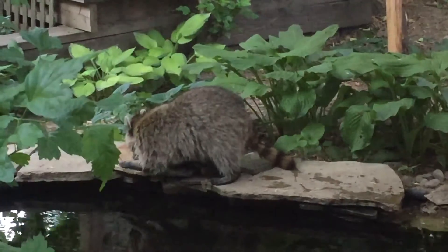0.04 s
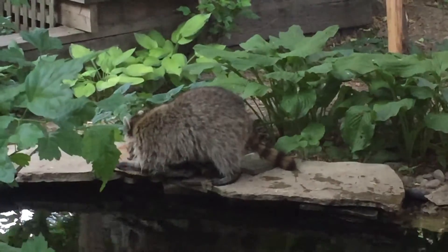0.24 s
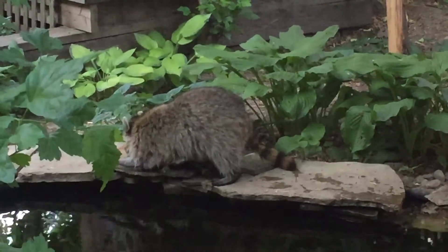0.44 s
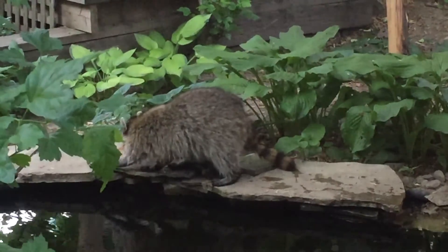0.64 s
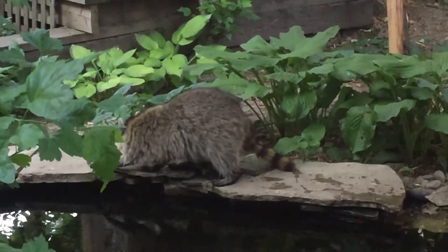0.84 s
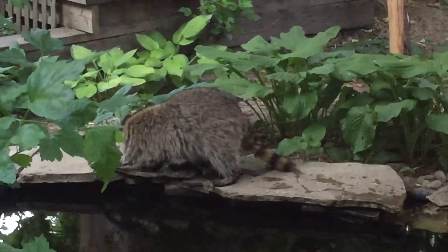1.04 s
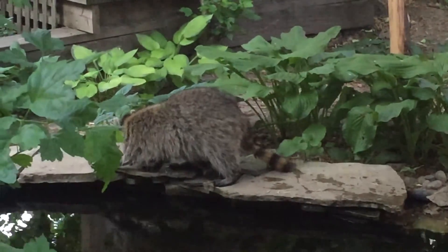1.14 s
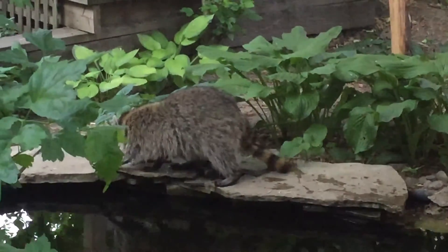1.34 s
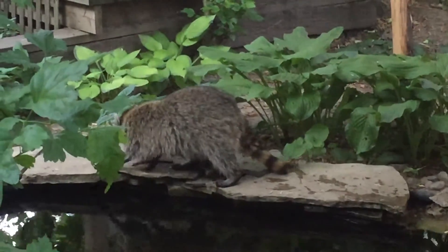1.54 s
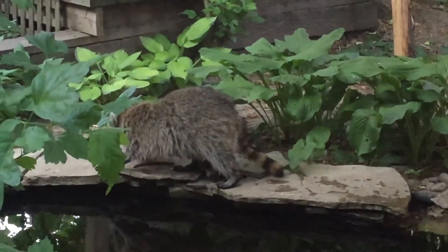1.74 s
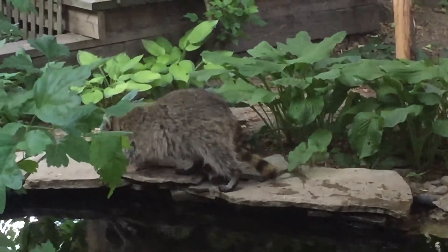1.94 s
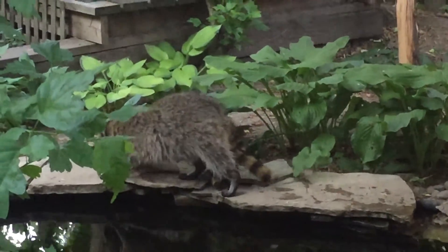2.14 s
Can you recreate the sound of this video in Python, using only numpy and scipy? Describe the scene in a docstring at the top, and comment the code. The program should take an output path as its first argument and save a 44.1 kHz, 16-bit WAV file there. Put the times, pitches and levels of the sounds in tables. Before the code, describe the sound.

A small bird gives one loud, rough chirp near the start, echoing briefly in a garden. Soft pond drips continue while a raccoon shuffles and ticks over leaves and stone, with faint far birds and a low town rumble.

```python
"""Chirp at a garden pond.

A small bird gives one loud, rough chirp; its two voices beat and ring between house walls.
Drips ring bubbles in the pond. A raccoon shuffles and ticks over stone and leaves.
Other birds whistle far off, over the low rumble of a town."""
import sys
import numpy as np
from scipy import signal
from scipy.fft import rfft, irfft, next_fast_len
from scipy.io import wavfile
from scipy.ndimage import uniform_filter1d, map_coordinates

SR = 44100
rng = np.random.default_rng(int(sys.argv[2]) if len(sys.argv) > 2 else 0)


def transcribe(signal):
    """Save signal, clipped to [-1, 1], as a 16-bit WAV file at the path in sys.argv[1]."""
    frames = np.atleast_2d(signal).T
    limited = np.clip(frames, -1, 1)
    pcm = np.round(limited * 32767).astype(np.int16)
    wavfile.write(sys.argv[1], SR, pcm)


N = 97020

# Spectra of town, air, leaves and splashes. Each row: frequency in Hz, relative level in dB.
RUMBLE_SPECTRUM = [(28, -49), (39, -14), (50, -3), (95, -0.5), (160, -11.5), (225, -10.5), (330, -17.5),
                   (480, -31), (900, -52)]
AIR_SPECTRUM = [(250, -11.5), (450, 1), (900, -1), (1500, -1.5), (2000, -4.5), (2900, -2), (4000, -14),
                (6500, -9), (9000, -12), (13500, -16), (15700, -28)]
LEAF_SPECTRUM = [(800, -2), (2000, -4.5), (4500, 3), (7000, -9), (10000, -11.5), (15500, -29)]
SPLASH_SPECTRUM = [(600, -34), (1250, 6), (1800, -4), (2600, -1.5), (4800, -14), (6500, -12), (14000, -46)]
# Yard decay. Each row: frequency in Hz, T60 in seconds.
YARD_DECAY = [(500, 0.39), (1500, 0.1), (2400, 0.45), (3200, 0.53), (4500, 0.44), (10000, 0.39)]
# House wall echoes. Each row: delay in seconds, gain in dB.
WALL_ECHOES = [(.017, -18), (.046, -22.5)]
# Far birds. Each row: start and length in seconds, start and end pitch in Hz, level in dB.
FAR_WHISTLES = [(0.819, 0.089, 2353, 2260, -61), (1.233, 0.035, 2930, 2300, -58),
                (1.305, 0.068, 2650, 3242, -57), (1.363, .125, 3170, 3130, -70.5),
                (1.39, 0.07, 2506, 2330, -65), (1.782, 0.019, 2970, 2790, -53),
                (1.901, 0.083, 3707, 3400, -62), (1.979, 0.059, 2860, 2810, -51.5)]
# Claws, twigs, leaves, plus the short rasp at 0.193 s that opens the chirp. Each row: start in seconds, level
# in dB, pitch in Hz, width in octaves.
DRY_TICKS = [(.055, -46, 2940, 0.1), (0.057, -45, 4870, .12), (.193, -47, 5300, 0.071),
             (0.628, -45.5, 5740, 0.076), (0.816, -48, 6500, 0.28), (.891, -42.5, 3100, 0.13),
             (1.003, -42, 5620, .09), (1.07, -43, 11800, 0.32), (1.128, -42.5, 3820, 0.25),
             (1.145, -44, 5900, .37), (1.158, -45, 4430, 0.068), (1.303, -47.5, 4100, .11),
             (1.354, -44, 13200, 0.29), (1.488, -51.5, 4300, .13), (1.494, -54, 11500, 0.7),
             (1.573, -49, 1430, 0.23), (1.613, -53, 3860, 0.11), (1.631, -46, 4180, 0.77),
             (1.709, -46.5, 2410, 0.047), (1.899, -37, 3080, 0.22), (1.906, -38, 3400, 0.15),
             (2.027, -44.5, 5260, 0.4)]
# Paws in leaves and in water. Each row: centre and half-length in seconds, level in dB.
LEAF_SHUFFLES = [(0.046, 0.084, -70.5), (.205, 0.054, -55.5), (0.319, 0.047, -60), (0.893, 0.16, -73.5),
                 (1.172, 0.086, -64), (2.048, .12, -75)]
PAW_SPLASHES = [(.175, .018, -61.5), (0.19, 0.011, -51), (1.575, 0.016, -62), (1.716, .012, -59.5),
                (1.78, 0.018, -64)]
# Drips. Each row: start in seconds, level in dB, bubble pitch in Hz, T60 in seconds.
POND_DRIPS = [(.04, -51, 1596, 0.046), (.083, -47.5, 1388, 0.03), (.16, -49.5, 1128, 0.051),
              (.17, -44.5, 1764, 0.044), (.19, -46.5, 1266, 0.059), (.301, -51, 1137, 0.048),
              (.407, -46.5, 778, 0.077), (.484, -50, 1795, 0.046), (.706, -53.5, 1470, .05),
              (.741, -52, 1498, 0.066), (.775, -51, 1686, 0.066), (.826, -54.5, 1410, 0.086),
              (1.087, -50, 1149, 0.036), (1.166, -52, 1405, 0.05), (1.254, -53, 1865, .045),
              (1.282, -46.5, 1152, 0.064), (1.456, -48.5, 1160, 0.053), (1.468, -46.5, 1000, 0.058),
              (1.579, -43, 1187, 0.076), (1.67, -47.5, 1260, 0.037), (1.789, -44, 1310, 0.052),
              (1.839, -53.5, 1210, 0.041), (1.865, -39.5, 1768, 0.031), (2.017, -47, 1098, 0.047),
              (2.115, -45.5, 1725, 0.036), (2.139, -53, 1135, 0.08)]
# The chirp's two voices. Each row: time in seconds, pitch in Hz, level in dB.
LOWER_VOICE = [(.199, 3195, -39), (.208, 3860, -44.5), (.218, 4100, -34.5), (.235, 4100, -33),
               (.242, 3486, -40), (.26, 3600, -37), (.272, 3204, -38.5), (.284, 3252, -36),
               (.298, 3156, -31), (.305, 2704, -38.5), (.316, 2527, -41), (.330, 2483, -51)]
UPPER_VOICE = [(.208, 4245, -38), (.220, 4500, -32.5), (.24, 4426, -33.5), (.26, 4400, -30.5),
               (.276, 4200, -30.5), (.289, 3850, -37), (.301, 3880, -28.5), (.309, 3920, -41)]


def amp(db):
    """Decibels to gain."""
    return 10 ** (np.asarray(db) / 20)


def unit(x):
    """Scale to rms 1."""
    return x / np.sqrt(np.mean(x ** 2) + 1e-20)


def along(points, hz):
    """Interpolate (Hz, value) points on a log axis."""
    point_hz, values = np.transpose(points)
    return np.interp(np.log(hz + 1), np.log(point_hz + 1), values)


def wobble(rate_hz):
    """Smooth random curve, rms near 1."""
    knots = rng.standard_normal(int(N * rate_hz / SR) + 4)
    return map_coordinates(knots, [np.arange(N) * rate_hz / SR])


def filtered(x, response):
    """Apply a frequency response."""
    size = next_fast_len(N + SR // 2)
    return irfft(rfft(x, size) * response(np.fft.rfftfreq(size, 1 / SR)), size)[:N]


def noise(spectrum):
    """Coloured noise, rms 1."""
    return unit(filtered(rng.standard_normal(N), lambda hz: amp(along(spectrum, hz))))


def since(start_s):
    """Seconds since the start, zero before it."""
    return np.maximum(np.arange(N) / SR - start_s, 0)


def gate(start_s, end_s, fade_s):
    """Soft-edged window."""
    edge_s = np.minimum(since(start_s), end_s - start_s - since(start_s))
    return np.sin(np.pi / 2 * np.clip(edge_s / fade_s, 0, 1)) ** 2


def swells(rows):
    """Envelope of one smooth bump per row."""
    return sum(amp(db) * gate(mid_s - half_s, mid_s + half_s, half_s) for mid_s, half_s, db in rows)


def phase_of(hz):
    """Phase of a moving pitch."""
    return 2 * np.pi * np.cumsum(hz) / SR


def scatter(x, echo_db, spread_s=.022):
    """Add early echoes off near stones and leaves."""
    delay, strength = rng.uniform(.05, 1, 14), rng.standard_normal(14)
    taps = np.bincount((delay * spread_s * SR).astype(int), strength * np.exp(-delay))
    return x + amp(echo_db) * signal.fftconvolve(x, taps / np.linalg.norm(taps))[:N]


def walls(x):
    """Add distinct echoes off the house walls."""
    echoes = lambda hz: sum(amp(db) * np.exp(-2j * np.pi * hz * s) for s, db in WALL_ECHOES)
    return x + filtered(x, echoes)


def yard(x, wet_db):
    """Add the diffuse tail among walls and plants."""
    hz, t, bins = signal.stft(rng.standard_normal(SR * 3 // 4), SR, nperseg=256)
    decay = amp(-60 * t / along(YARD_DECAY, hz)[:, None])
    tail = signal.istft(bins * decay * (1 - np.exp(-t / .0016)), SR)[1]
    return x + amp(wet_db) * signal.fftconvolve(x, tail / np.linalg.norm(tail))[:N]


def town(rumble_db=-52, fade_db_per_s=2.5, hum_hz=63.6, hum_db=-61.5):
    """Rumble and faint mains hum. The bass swells unevenly; the upper part recedes."""
    rumble = noise(RUMBLE_SPECTRUM) * amp(rumble_db)
    bass = filtered(rumble, lambda hz: 1 / (1 + (hz / 130) ** 4))
    upper = (rumble - bass) * amp(fade_db_per_s * (1 - since(0)))
    hum = np.sqrt(2) * amp(hum_db) * np.sin(phase_of(hum_hz + wobble(3.96)))
    return upper + bass * amp(2.6 * wobble(13.3)) + hum


def air(level_db=-65.5, patch_db=1.3):
    """Hiss of air. Stirring leaves vary its gain in patches of time and pitch."""
    flutter = amp(.6 * wobble(12))
    bins = signal.stft(noise(AIR_SPECTRUM), nperseg=256)[2]
    patches = uniform_filter1d(rng.standard_normal(bins.shape), size=12, axis=0)
    patches = unit(uniform_filter1d(patches, size=16, axis=1))
    hiss = signal.istft(bins * amp(patch_db * patches), nperseg=256)[1][:N]
    return unit(hiss) * amp(level_db) * flutter


def far_birds():
    """Short wavering whistles, blurred by the yard."""
    out = np.zeros(N)
    for start_s, length_s, start_hz, end_hz, db in FAR_WHISTLES:
        hz = np.interp(since(start_s), [0, length_s], [start_hz, end_hz]) * (1 + .017 * wobble(300))
        envelope = amp(db + 2 * wobble(90)) * gate(start_s, start_s + length_s, .0085)
        out += envelope * np.sin(phase_of(hz))
    return yard(scatter(out, echo_db=-3), wet_db=-14)


def tick(t, hz, width_oct, crack_t60_s=.01, tail_t60_s=.06):
    """Claw, twig, leaf or brief rasp: a damped click and a noisy crack with a short tail."""
    click = np.sin(2 * np.pi * hz * t) * np.exp(-np.pi * width_oct * hz * t) / (1 + (hz / 6000) ** 2)
    band = lambda f: 1 / (1 + (np.log2((f + 1) / hz) / width_oct) ** 2 / 2) ** 2
    crack = unit(filtered(rng.standard_normal(N), band))
    rise_s = .0005 * (1 + (hz / 7500) ** 2) ** 2  # the highest ticks are soft leaf brushes
    attack = 1 - np.exp(-(t / rise_s) ** 2)
    decay = amp(-60 * t / crack_t60_s) + .45 * amp(-60 * t / tail_t60_s)
    return click + .53 * crack * attack * decay


def raccoon(floor_db=-72):
    """Dry ticks and soft, crackling shuffles in the leaves; the ticks also carry the brief rasp that opens the
    chirp."""
    ticks = sum(amp(db) * tick(since(start_s), hz, width) for start_s, db, hz, width in DRY_TICKS)
    leaves = noise(LEAF_SPECTRUM)
    crackle_db = 6.3 * np.tanh(wobble(350) / 2)
    stir_db = 3.5 * wobble(29.65)
    effort = swells(LEAF_SHUFFLES) + amp(floor_db)
    return yard(ticks + effort * unit(leaves * amp(crackle_db + stir_db)), wet_db=-11)


def trickle(count=45, mid_db=-61.5, mid_hz=1762, t60_s=.046):
    """Drip rows for tiny random bubbles."""
    return [(when * N / SR, mid_db + 7 * (level - .5), mid_hz * 2 ** (1.675 * (pitch - .5)), t60_s)
            for when, level, pitch in rng.random((count, 3))]


def pond(bend=.045, settle_s=.002, splash_db=-18):
    """Each drop splashes and rings a bubble that settles on its pitch. Paws stir the water."""
    out = np.zeros(N)
    splash = unit(noise(SPLASH_SPECTRUM) * amp(1.6 * wobble(300)))
    drops = list(POND_DRIPS) + trickle()
    waver = .02 * wobble(250)
    for start_s, db, hz, t60_s in drops:
        first = int(start_s * SR)
        age_s = np.arange(min(SR // 8, N - first)) / SR
        span = slice(first, first + len(age_s))
        bubble = np.sin(phase_of(hz * (1 + bend * np.exp(-age_s / settle_s) + waver[span])))
        attack = 1 - np.exp(-age_s / (.073 * t60_s))
        envelope = 2 * attack * amp(db - 60 * age_s / t60_s)
        out[span] += envelope * (bubble + amp(splash_db) * splash[span])
    out += splash * swells(PAW_SPLASHES)
    return yard(walls(scatter(out, echo_db=-5.5)), wet_db=-10.5)


def rasp(phase, width_hz):
    """Noise band that follows a tone."""
    return wobble(width_hz) * np.sin(phase) + wobble(width_hz) * np.cos(phase)


def voice(rows, trill_hz=90, trill_peak_s=.3215, trill_grow_s=.053, buzz_hz=290, throat_hz=4504):
    """One side of the syrinx: a raspy whistle with a deepening trill and weak, noisy overtones."""
    times_s, hz, db = np.transpose(rows)
    t = since(0)
    trill_depth = .058 * np.exp(np.minimum(t - trill_peak_s, 0) / trill_grow_s)
    trill = trill_depth * np.cos(2 * np.pi * trill_hz * (t - trill_peak_s))
    buzz = .045 * np.sin(phase_of(buzz_hz * (1 + .15 * wobble(100))))
    jitter = .011 * wobble(400)
    phase = phase_of(np.interp(t, times_s, hz) * (1 + buzz + trill + jitter))
    shimmer_db = 2 * wobble(303)
    envelope = amp(np.interp(t, times_s, db) + shimmer_db) * gate(times_s[0], times_s[-1], .0021)
    overtones = amp(-33.5) * rasp(2 * phase, 520) + amp(-36.5) * rasp(3 * phase, 1700)
    fundamental = np.sin(phase) + .36 * rasp(phase, 520)
    throat_lowpass = lambda f: 1 / (1 + (f / throat_hz) ** 70)
    return filtered(envelope * fundamental, throat_lowpass) + envelope * overtones


def chirp():
    """Two voices beat; the walls throw them back."""
    call = voice(LOWER_VOICE) + voice(UPPER_VOICE)
    return yard(walls(scatter(call, echo_db=-5.5)), wet_db=-3.5)


def scene():
    """Mono mix."""
    return (chirp() + far_birds() + pond() + raccoon() + town() + air())[None]


def record(dry, top_hz=15750):
    """Brick-wall low-pass."""
    return filtered(dry[0], lambda hz: hz < top_hz)[None]


dry = scene()
out = record(dry)
transcribe(out)
```